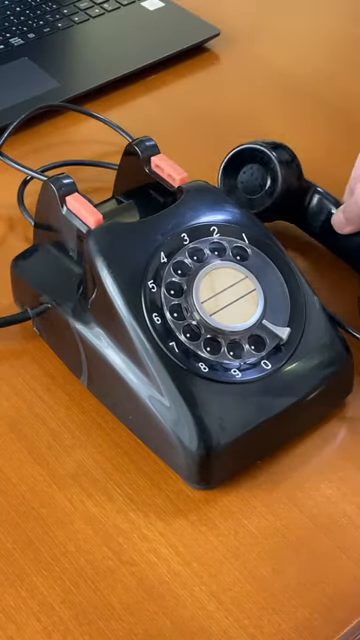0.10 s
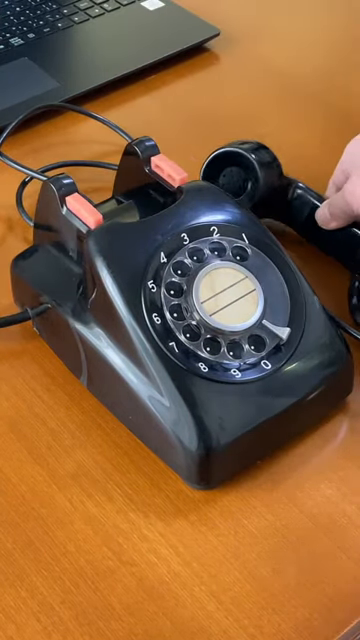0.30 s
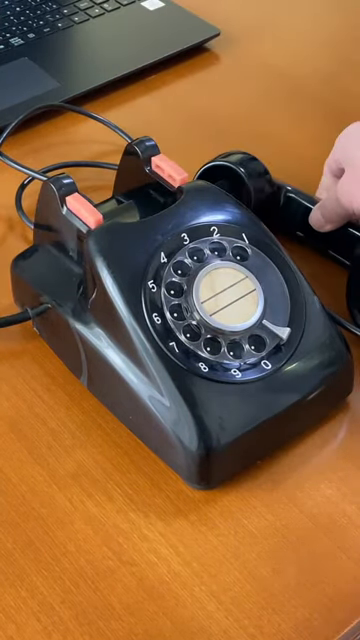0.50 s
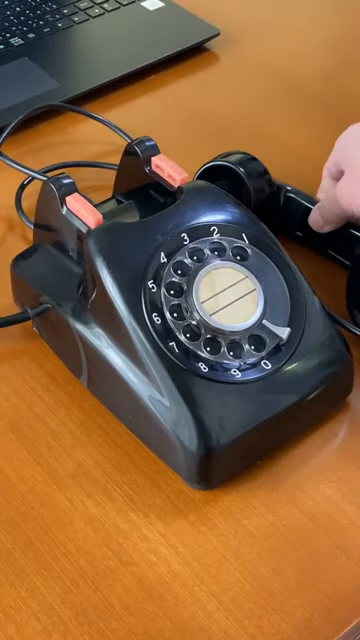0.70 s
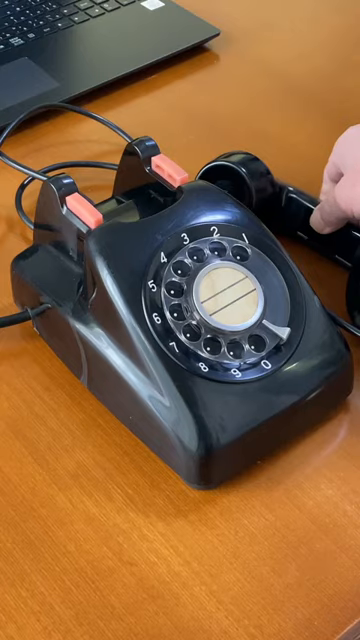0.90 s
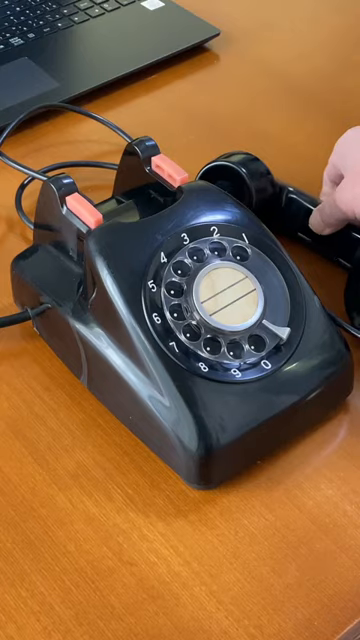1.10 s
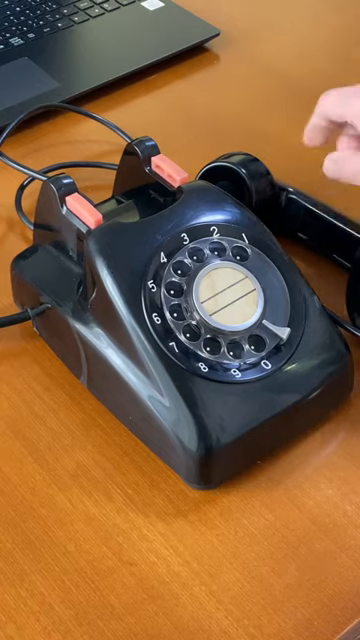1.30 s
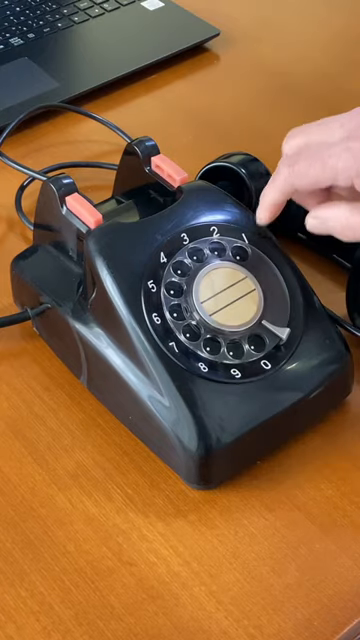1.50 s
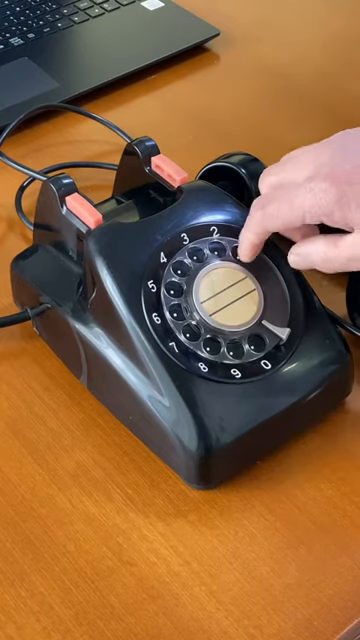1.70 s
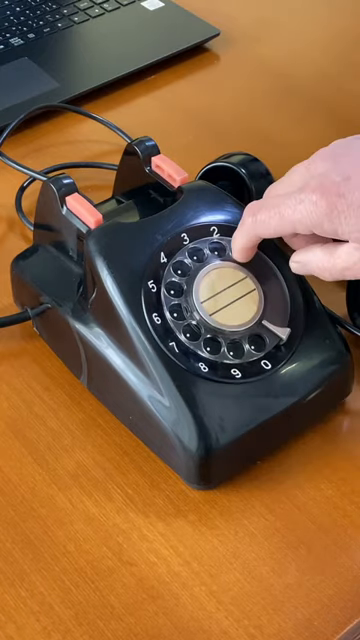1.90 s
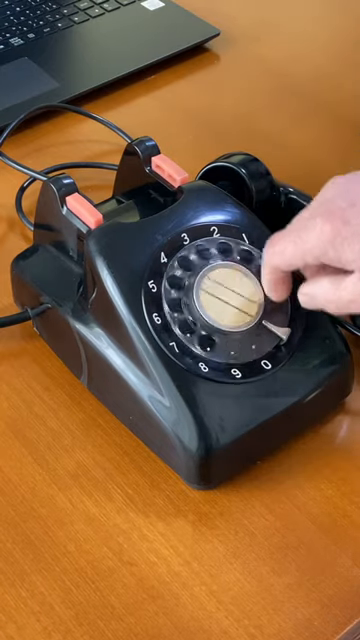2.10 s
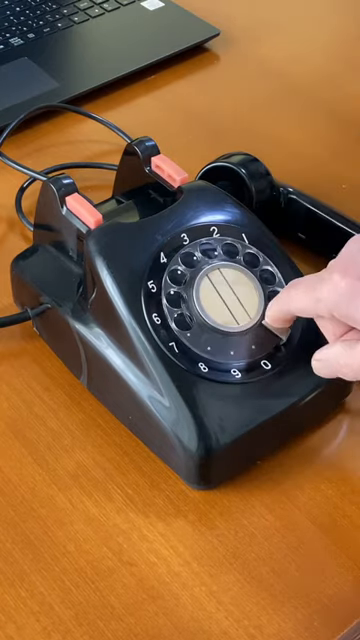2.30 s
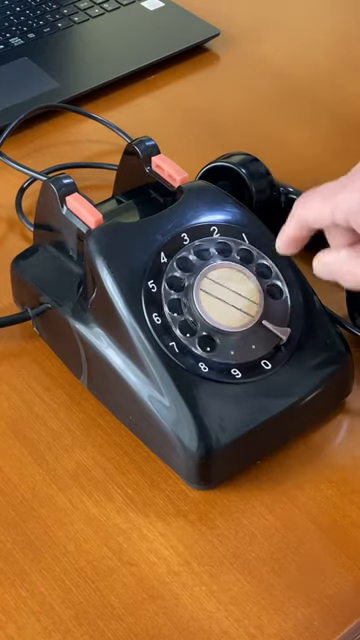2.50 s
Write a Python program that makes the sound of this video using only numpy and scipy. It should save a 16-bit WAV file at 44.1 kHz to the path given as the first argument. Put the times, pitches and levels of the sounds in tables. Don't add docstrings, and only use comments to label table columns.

```python
import sys
import numpy as np
from scipy import signal
from scipy.fft import rfft, irfft
from scipy.io import wavfile
from scipy.ndimage import uniform_filter1d

SR = 44100
rng = np.random.default_rng(int(sys.argv[2]) if len(sys.argv) > 2 else 0)


def boost(x):
    u = np.asarray(x, float) / 20
    return 10 ** u


def to_wav(sig):
    pcm = np.clip(np.atleast_2d(sig), -1, 1) * 32767
    pcm = np.round(pcm).astype(np.int16)
    wavfile.write(sys.argv[1], SR, pcm.T)


N = 114660


def evened(x):
    return x / np.sqrt(np.mean(x ** 2) + 1e-20)


def peaked(x):
    return x / abs(x).max()


def read(points, hz):
    f, value = np.transpose(points)
    return np.interp(np.log(hz + 1), np.log(f + 1), value)


def colour(x, points):
    hz = np.fft.rfftfreq(len(x), 1 / SR)
    return irfft(rfft(x) * boost(read(points, hz)), len(x))


def add(mix, s, sound):
    part = mix[round(s * SR):][:len(sound)]
    part += sound[:len(part)]


def level(curve):
    s, db = np.transpose(curve)
    gain_db = np.interp(np.arange(N) / SR, s, db, -150, -150)
    return boost(uniform_filter1d(gain_db, size=100))


def ring(modes, damp, rise_s):
    t = np.arange(SR // 2) / SR
    detune = 0.0061
    tones = 0
    for hz, db, t60 in modes:
        db_luck, hz_luck, phase_luck = rng.standard_normal(3)
        decay = boost(db + 2.0 * db_luck - 60 * t / (damp * t60))
        rise = (1 - np.exp(-t * hz / (400 * rise_s))) ** 2
        tones = tones + decay * rise * np.sin(2 * np.pi * hz * (1 + detune * hz_luck) * t + 0.55 * phase_luck)
    return peaked(tones)


def snap(points, t60):
    t = np.arange(SR // 10) / SR
    rise_s = 0.00029
    burst = colour(rng.standard_normal(len(t)), points)
    return peaked(burst * boost(-60 * t / t60) * (1 - np.exp(-t / rise_s)))


def grit(per_s, spread_db):
    size = boost(spread_db * np.minimum(rng.exponential(1, N), 4))
    return size * (rng.random(N) < per_s / SR) * rng.choice([-1., 1.], N)


# (time [s], thud [dB], clack [dB], tick [dB])
KNOCKS = [(0.078, -51, -65.5, -72), (0.143, -57.5, -56.5, -79.5), (0.221, -55, -59, -88.5),
          (0.242, -22, -23, -37), (0.2445, -8.5, -30.5, -56), (0.277, -14, -26, -43),
          (0.291, -19, -37, -62), (0.307, -23, -32.5, -55), (0.35, -6, -13.5, -33),
          (0.358, -24, -29, -58.5), (0.388, -12.5, -25, -46), (0.411, -20.5, -36.5, -76.5)]
# (frequency [Hz], level [dB], t60 [s])
DESK_MODES = [(102.7, -11.5, .7), (221.2, 1, 0.47), (257.8, -2, 0.43), (310.4, -7, 0.33), (344.2, -5, 0.37),
              (397.7, 0.5, 0.31), (436.5, 0, 0.38), (508, -7.5, .25), (580.4, -3.5, 0.26), (628, -4, 0.38),
              (770.4, -7, 0.31), (984.7, -9.5, 0.25)]
# (frequency [Hz], level [dB])
SHELL_CLACK = [(700, -36.5), (1000, -1.5), (1600, 5), (2300, -5.5), (3300, -7), (4000, -17.5), (4500, -10),
               (5800, -22)]
# (frequency [Hz], level [dB], t60 [s])
SHELL_MODES = [(1076, -1.5, 0.05), (1230, -5.5, 0.05), (1623, -3.5, .05), (1790, -6, 0.058),
               (2119, -7, 0.047), (2280, 1.5, 0.013), (4380, -21, 0.01)]
# (frequency [Hz], level [dB])
TICK_TONE = [(4500, -27), (6100, -0.5), (8000, -5.5), (10000, -3.5), (11500, -14.5), (13000, -26),
             (15000, -35), (16300, -53)]


def knocks():
    out = np.zeros(N)
    for s, thud_db, clack_db, tick_db in KNOCKS:
        add(out, s, boost(thud_db + 7.0) * ring(DESK_MODES, damp=0.16, rise_s=0.0039))
        add(out, s, boost(clack_db + 8.5) * snap(SHELL_CLACK, t60=0.02))
        add(out, s, boost(clack_db + 3.0) * ring(SHELL_MODES, damp=0.93, rise_s=0.002))
        add(out, s, boost(tick_db + 10.5) * snap(TICK_TONE, t60=0.0082))
    return out


# (landing time [s], level [dB])
SETTLE = [
    (0.245, -31.5),
    (.351, -21.5),
]


def settling():
    t = np.arange(N) / SR
    rise_db_per_s = 1399.5
    scrape = evened(colour(rng.standard_normal(N), [(250, -36.5), (600, 6), (2500, -6), (6000, -32.0)]))
    return scrape * sum(boost(db - rise_db_per_s * np.maximum(s - t, 0)) * (t < s) for s, db in SETTLE)


# (time [s], level [dB])
HAND_SLIDE = [
    (.62, -75.5),
    (.85, -68),
    (1.0, -75.5),
    (1.05, -73),
    (1.08, -55.5),
    (1.17, -60),
    (1.28, -88),
    (1.6, -95.5),
    (1.68, -67),
]
# (frequency [Hz], level [dB])
SLIDE_TONE = [(150, 0.5), (250, 2.5), (550, 3), (850, -18), (2600, -28), (4800, -11.5), (5300, -35),
              (14000, -23)]


def hand_slide():
    return level(HAND_SLIDE) * evened(colour(grit(4600, 1.1), SLIDE_TONE))


def handset():
    return knocks() + settling() + hand_slide()


def teeth(per_s, uneven, spread_db, scrape_db):
    wobble = evened(uniform_filter1d(rng.standard_normal(N), size=300))
    turned = np.cumsum(per_s * np.exp(uneven * wobble)) / SR
    passing = np.diff(np.floor(turned), prepend=0)
    contact = signal.butter(2, 1440, fs=SR)
    hits = signal.lfilter(*contact, passing * boost(spread_db * rng.standard_normal(N)))
    return evened(hits) + boost(scrape_db) * evened(grit(5000, 2.5))


def gears(body, curve, drive):
    out = 0
    for hz, width_hz, db in body:
        b, a = signal.iirpeak(hz, hz / width_hz, SR)
        once = signal.lfilter(b, a, drive)
        out = out + boost(db) * signal.lfilter(b, a, once)
    return level(curve) * evened(out)


# (time [s], level [dB])
WIND = [
    (1.958, -72),
    (1.959, -58.5),
    (2.03, -56),
    (2.09, -54),
    (2.149, -47),
    (2.18, -56),
    (2.2, -99),
    (2.25, -99),
    (2.33, -96),
]
# (frequency [Hz], width [Hz], level [dB])
WIND_BODY = [(420, 305, 9), (746, 500, -30), (1190, 480, 12), (1520, 94, 17), (1740, 130, 14.5),
             (2600, 1900, 1.5), (4150, 390, 6.5), (7840, 3000, -26), (14600, 1600, -13)]
# (time [s], level [dB])
BACK = [
    (2.338, -70),
    (2.376, -47.5),
    (2.381, -41.5),
    (2.44, -42.5),
    (2.465, -45.5),
    (2.55, -48.5),
    (2.556, -47),
    (2.6, -45.5),
]
# (frequency [Hz], width [Hz], level [dB])
BACK_BODY = [(213.9, 110, -18), (420, 130, -9), (646.6, 46, -8), (873.5, 88, -3.5), (1190, 190, -6.5),
             (1530, 850, -11), (2450, 1100, -10.5), (4160, 530, -8), (8260, 7300, -18), (14500, 1400, -45)]
# (time [s], tick [dB], ping [dB], ping frequency [Hz])
CLICKS = [(1.960, -66, -57.5, 2380), (1.978, -57, -68.5, 2702), (1.988, -52, -62, 1800),
          (2.041, -44, -63, 2360), (2.065, -74, -51, 1486), (2.086, -51, -49, 1700),
          (2.091, -43.5, -56, 1230), (2.097, -41, -54, 1340), (2.104, -63, -53, 3400),
          (2.128, -61, -48, 1610), (2.138, -56, -47.5, 1390), (2.145, -46.5, -53, 1390),
          (2.171, -53.5, -56, 1520), (2.289, -80, -72, 1410), (2.7, -65, -42, 1190),
          (2.381, -71, -46, 2420), (2.384, -70.5, -42, 420), (2.407, -50.5, -46, 1740),
          (2.407, -73, -44.5, 1560), (2.412, -67, -43, 420), (2.418, -52, -47, 2470),
          (2.429, -72, -39.5, 436), (2.431, -40, -68, 2600), (2.436, -46, -43, 2450),
          (2.440, -60, -50, 3400), (2.513, -45.5, -42, 2215), (2.523, -45, -42, 2760),
          (2.524, -67, -45, 1740), (2.552, -53, -42, 2468), (2.3, -72.5, -62, 1600),
          (2.554, -67, -40.5, 1190), (2.570, -55, -46, 840), (2.579, -56, -47.5, 1230),
          (2.597, -56, -41.5, 450)]
# (frequency [Hz], level [dB])
CLICK_TONE = [(1500, -4), (3000, -5), (5000, 0.5), (7000, -1.5), (8600, 2), (10500, -4.5), (12500, -38)]


def dial():
    out = gears(WIND_BODY, WIND, teeth(per_s=135, uneven=0.78, spread_db=1, scrape_db=3))
    out += gears(BACK_BODY, BACK, teeth(per_s=190, uneven=0.85, spread_db=3, scrape_db=-7))
    sheen_tone = [(12500, -19.5), (13800, -5.5), (16000, -15), (16500, -14)]
    for s, tick_db, ping_db, hz in CLICKS:
        sheen_db = -1.5 if s > BACK[0][0] else 6
        ping_t60 = 0.034 * np.sqrt(2000 / hz)
        add(out, s, boost(tick_db + 8.0) * snap(CLICK_TONE, t60=0.02))
        add(out, s, boost(tick_db + sheen_db) * snap(sheen_tone, t60=0.06))
        add(out, s, boost(ping_db + 2) * ring([(hz, 0, ping_t60)], damp=1, rise_s=0.002))
    return out


# (order, peak [dB])
MOTOR = [(1, -34.5), (2, -72), (3, -75.5)]
# (order, peak [dB])
MAINS = [(2, -57), (3, -77), (4, -72.5), (5, -77.5)]
# (frequency [Hz], peak [dB])
WHINE = [(318, -80), (580, -83.5)]


def hum():
    t = np.arange(N) / SR
    motor_hz, pump_hz, mains_hz, drone_hz = 48.53, 51.31, 49.965, 91.6
    from_dip = 2 * np.pi * (t - 1.07)
    from_peak = 2 * np.pi * (t - 1.52)
    out = -boost(-61.5) * np.cos(pump_hz * from_dip)
    out += boost(-63) * np.cos(drone_hz * from_peak)
    for order, db in MOTOR:
        out += boost(db) * np.cos(order * motor_hz * from_dip)
    for order, db in MAINS:
        out += boost(db) * np.cos(order * mains_hz * from_peak)
    for hz, db in WHINE:
        drift = uniform_filter1d(rng.standard_normal(N), size=4000)
        waver = evened(uniform_filter1d(drift, size=4000))
        out += boost(db + 3.0 * waver) * np.cos(2 * np.pi * hz * t + waver)
    return out


# (frequency [Hz], level [dB])
AIR_TONE = [(30, -17.5), (100, -3.5), (160, -14), (330, -23.5), (480, -34), (2000, -39.5), (8500, -41.5),
            (13500, -37.5), (16300, -60)]
# (frequency [Hz], likeness [0-1])
AIR_SAME = [(60, 1), (130, 0.3), (290, 0.3), (640, 0.29), (3100, 0.17), (5500, 1), (15000, 0.94)]


def air():
    frames, hz = N // 256 + 5, np.fft.rfftfreq(1024, 1 / SR)
    a, b, c, d, patches = rng.standard_normal((frames, 513, 5)).T
    patches = uniform_filter1d(patches, size=6, axis=0)
    patches = evened(uniform_filter1d(patches, size=14, axis=1))
    same = np.clip(read(AIR_SAME, hz), -1, 1)[:, None]
    left, other = a + 1j * b, c + 1j * d
    z = np.array([left, same * left + np.sqrt(1 - same ** 2) * other])
    z *= boost(read(AIR_TONE, hz)[:, None] + 2 * patches)
    noise = signal.istft(z, nperseg=1024, noverlap=768)[1][:, :N]
    return boost(-64) * evened(noise)


# (frequency [Hz], t60 [s])
ROOM_T60 = [(60, 0.26), (200, .38), (600, 0.35), (1500, .3), (4000, .3), (8000, 0.24), (14000, 0.13)]
# (frequency [Hz], likeness [0-1])
ROOM_SAME = [(150, 1), (300, 0.86), (700, 0.44), (1400, 0.1), (2800, 0.4), (5500, 0.48)]


def room(x):
    taps = np.zeros((2, SR))
    at = np.arange(200, SR - 20, 20) + rng.integers(0, 20, (2, (SR - 201) // 20))
    np.put_along_axis(taps, at, rng.choice([-1., 1.], at.shape), 1)
    hz, t, z = signal.stft(taps, SR, nperseg=512)
    same = np.clip(read(ROOM_SAME, hz), 0, 1)[:, None]
    z[1] = same * z[0] + np.sqrt(1 - same ** 2) * z[1]
    decay = boost(-60 * t / read(ROOM_T60, hz)[:, None])
    tail = signal.istft(z * decay, SR, nperseg=512)[1]
    return signal.fftconvolve(x[None], tail / np.linalg.norm(tail[0]), axes=1)[:, :N]


def scene():
    desk, phone = handset(), dial()
    reflected = room(boost(-6.5) * desk + boost(-9.5) * phone)
    return desk + phone + reflected + hum() + air()


def band_limit(x):
    return signal.sosfilt(signal.butter(12, 16480, fs=SR, output="sos"), x)


# (frequency [Hz], level [dB])
COLOUR = [(20, -11.5), (45, -2), (4700, -2.5), (5400, -3.5), (6200, -1.5), (10600, -4.5), (11800, -12.5),
          (13200, -7), (16200, -5), (16500, -48)]
# (frequency [Hz], left over right [dB])
LEAN = [(40, 6), (110, 3), (300, 3.5), (700, 0.5), (1300, -1), (2400, 0), (16000, 0)]
# (frequency [Hz], left lead [rad])
LEAD = [(60, 0.01), (250, -0.02), (900, -2.5), (1600, 1.5), (2700, -1.3), (5500, -2.5), (7750, -1.06),
        (11600, 2.5), (14500, 5)]


def record(dry):
    hz = np.fft.rfftfreq(N, 1 / SR)
    gain = boost(read(COLOUR, hz) + np.outer([.5, -.5], read(LEAN, hz)))
    phase = np.exp(.5j * np.outer([1, -1], read(LEAD, hz)))
    mix = irfft(rfft(dry) * gain * phase, N)
    return band_limit(mix)


dry = scene()
out = record(dry)
to_wav(out)
```